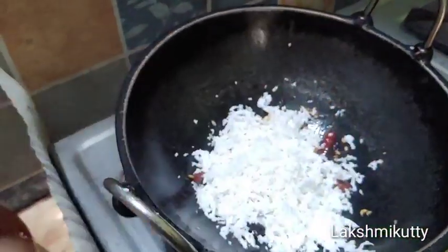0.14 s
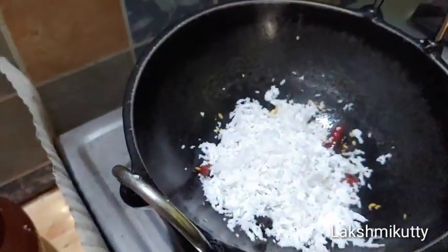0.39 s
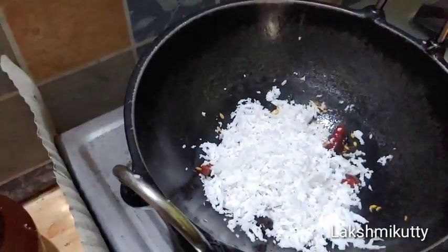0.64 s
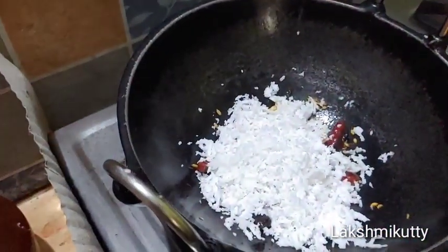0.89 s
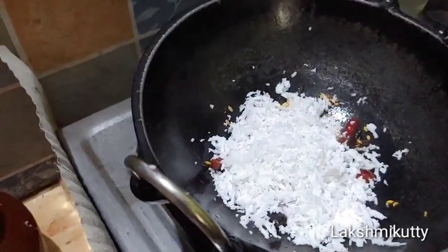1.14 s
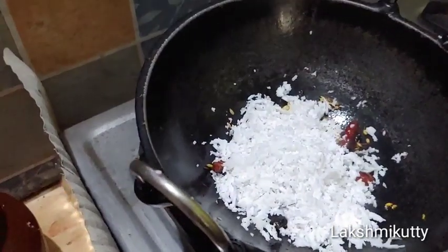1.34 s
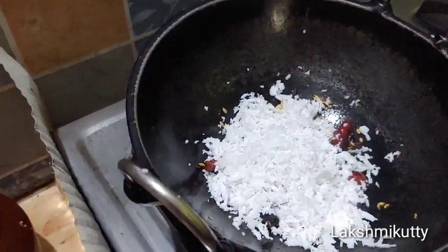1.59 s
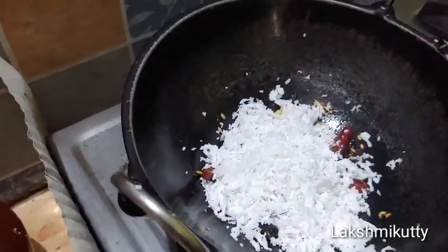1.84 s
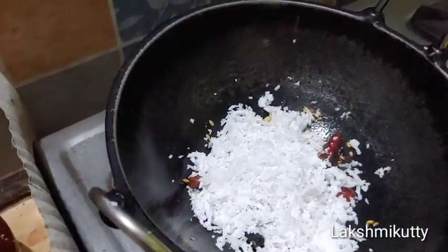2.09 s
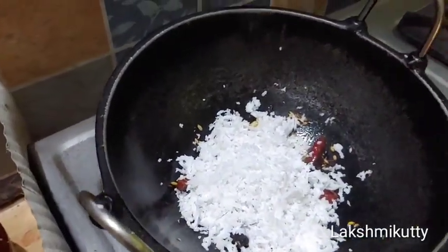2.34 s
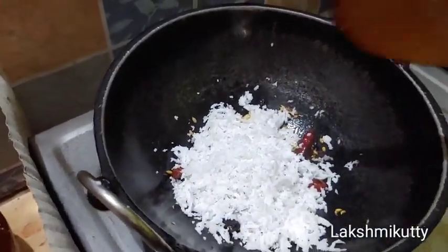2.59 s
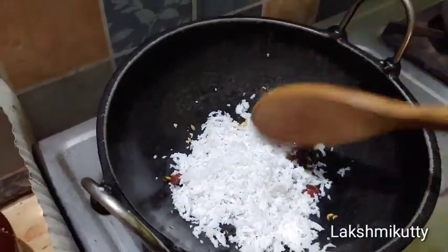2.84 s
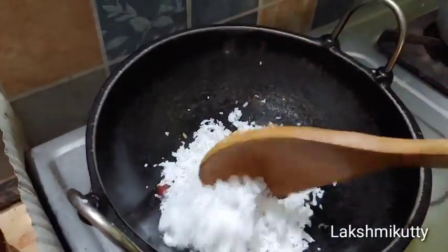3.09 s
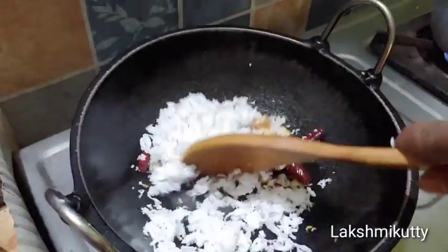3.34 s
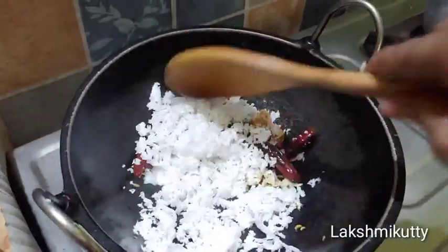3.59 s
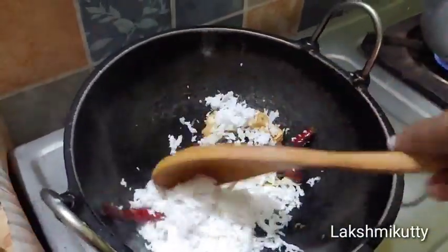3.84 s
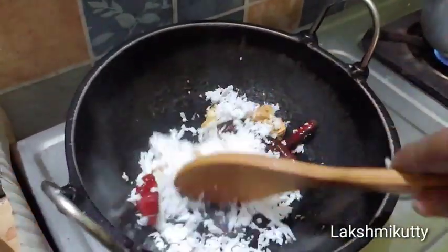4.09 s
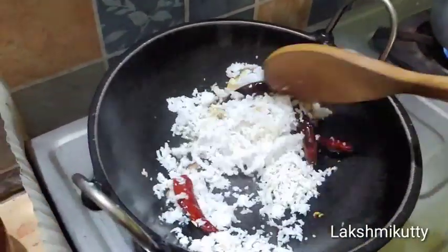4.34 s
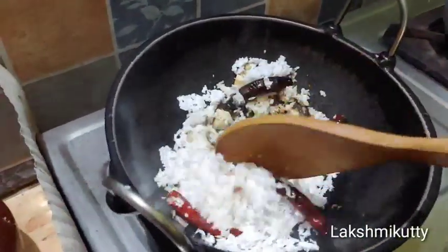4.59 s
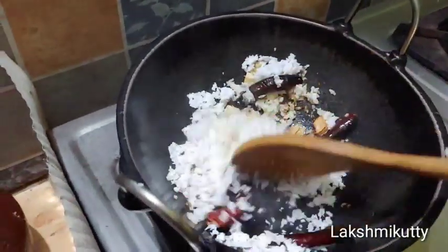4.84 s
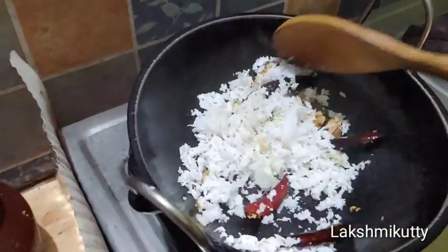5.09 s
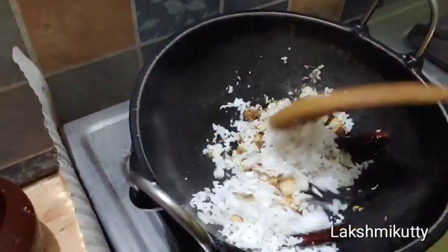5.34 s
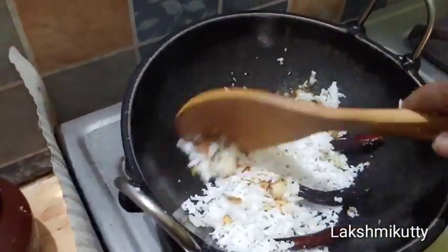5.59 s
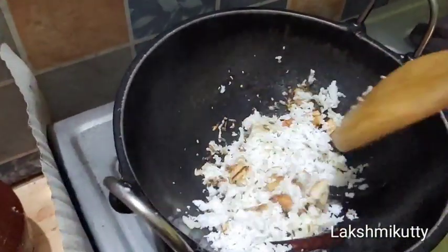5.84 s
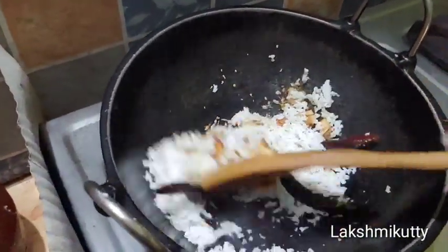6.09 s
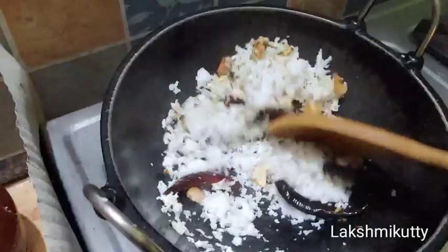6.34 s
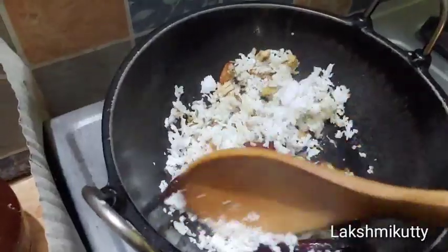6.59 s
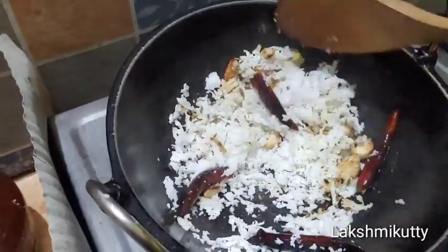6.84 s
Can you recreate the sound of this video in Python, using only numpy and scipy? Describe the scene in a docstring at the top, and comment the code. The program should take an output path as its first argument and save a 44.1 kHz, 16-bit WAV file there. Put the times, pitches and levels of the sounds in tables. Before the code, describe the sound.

Seeds pop sharply over a fine oil sizzle, then a wooden spatula knocks and scrapes the metal pan as frying surges and glass bangles clink.

```python
"""Spices fry in hot oil in a deep metal pan under grated coconut, close below a phone in a small tiled kitchen.
First, seeds pop as resonant noise bursts over a fine sizzle: random clicks and hiss shaped by spectra.
Then a wooden spatula scrapes and knocks the pan, exciting its damped modes, and the sizzle swells in power;
glass bangles clink on the wrist as pairs of damped sines, tones are held, and handling gives dull low bumps.
A short tail of filtered noise from the tiled walls and a low rumble of shaped noise lie beneath it all."""
import sys
import numpy as np
from scipy import signal
from scipy.fft import rfft, irfft
from scipy.io import wavfile
from scipy.ndimage import uniform_filter1d

SR = 44100
rng = np.random.default_rng(int(sys.argv[2]) if len(sys.argv) > 2 else 0)


def ratio_of_db(decibels):
    """Turn decibels (scalar or array-like) into linear amplitude factors; 0 dB maps to 1."""
    return 10 ** (np.asarray(decibels, float) / 20)


def to_wav(s):
    """Save 16-bit WAV."""
    ch = np.atleast_2d(s).T  # columns
    pcm = np.round(np.clip(ch, -1, 1) * 32767)  # PCM
    wavfile.write(sys.argv[1], SR, pcm.astype(np.int16))


N = 306495
TIME = np.arange(N) / SR
SIDES = np.array([[1], [-1]])  # left, right

# simmer of the oil, livelier once the heap is turned: t/s, fine sizzle level/dB, coarse sputter level/dB
SIMMER = [(0.0, -35.5, -51), (0.4, -38, -43), (1.25, -37.5, -40), (1.9, -38.5, -39.5), (2.6, -37.5, -45.5),
          (2.899, -40, -42), (3.15, -37.5, -47), (3.6, -30, -35), (4.0, -32.5, -37), (4.4, -30.5, -40),
          (4.78, -28, -33), (5.11, -29.5, -39), (5.5, -30.5, -35.5), (5.96, -31.5, -37.5),
          (6.12, -23.5, -30), (6.28, -25, -31.5), (6.52, -28, -36), (6.95, -26, -35)]
# swells of the frying sound, most of them while the pan is stirred; a slope of 0 or less acts as 1 ms per 10 dB:
# peak t/s, fine level/dB, coarse level/dB, rise/(s per 10 dB), fall/(s per 10 dB)
SWELLS = [(0.05, -34.5, -25, 0.3, 0.16), (1.335, -38, -30.5, .03, 0.1), (2.984, -22, -20.5, -0.02, 0.02),
          (3.235, -27.5, -47, 0.06, 0.1), (3.331, -17, -17.5, 0.07, 0.17),
          (3.742, -17.5, -19, 0.1134, 0.12), (3.86, -35, -29, 0, -0.2), (3.944, -28, -24.5, .04, -0.6),
          (4.066, -20.5, -44, 0.09, 0.28), (4.159, -21.5, -20.5, 0.09, 0.26),
          (4.475, -18.5, -20.5, 0.05, 0.18), (4.565, -15, -34, -0.16, -0.2), (4.74, -27, -37, -0.18, -0.07),
          (4.834, -22.5, -29, 0.07, 0.06), (4.915, -21.5, -24, 0.12, 0.1), (5.0, -27, -33, 0.2, 0.06),
          (5.205, -22.5, -25, 0.11, 0.1), (5.29, -30, -50, 0, 0.2), (5.349, -19, -34, -0.3, -0.18),
          (5.45, -25.5, -42, 0.27, -1), (5.589, -21, -22.5, 0.07, 0.05), (5.662, -25.5, -44, 0.16, .35),
          (6.349, -20, -22.5, 0.07, .1), (6.465, -26, -44, 0.2, 0), (6.66, -24, -35, 0.12, 0.14),
          (6.73, -23, -28.5, 0.14, 0.1)]
# sudden spatters: t/s, fine level/dB, coarse level/dB, fall/(s per 10 dB)
SPATTERS = [(0.227, -29, -19, 0.1146), (2.924, -25, -19, 0.13), (3.246, -22.5, -17, 0.2),
            (5.982, -26, -23, 0.09)]
# spectrum of the fine sizzle: f/Hz, density level/dB (per Hz)
FINE_SPECTRUM = [(1470, -19.5), (2500, -6.5), (2680, -6.5), (3230, -5), (3950, -7), (4580, -5.5),
                 (5740, -8), (6650, 2), (7470, -4), (9220, -1.5), (11100, -9), (12400, -2), (13700, -7),
                 (14900, -2), (16000, -37)]
# spectrum of the coarse sputter: f/Hz, density level/dB (per Hz)
COARSE_SPECTRUM = [(180, -53), (300, -18), (598, -14), (758, -4.5), (1020, -5), (1420, -3), (1650, -0.5),
                   (1890, -0.5), (2970, -3), (6000, -5.5), (7800, -8.5), (13200, -120)]
# loud pops, energy by band: t/s, crack level/dB, body level/dB, snap level/dB, left minus right level/dB
POPS = [(0.015, 9.5, -2.5, -20, 2), (0.0366, 6, -5, 8.5, -6), (0.043, 11.5, 3, -22, 2),
        (0.0583, 0, -6.5, -20, -18), (0.1128, -4, -5, -4, 0), (0.1813, -2.5, -13, -3, 10),
        (0.2095, -8, -15, -2, 1), (0.224, 7.5, -5, 9.5, 10), (0.2306, 4.5, 2, 6, -14.5),
        (0.263, -4, -14, -18, 3), (0.2727, 1, -5, 3, 6), (0.3119, 1, -4.5, 1, -1),
        (0.3182, -7, -23, 1.5, 17), (0.391, -16, -13, -4, 2), (0.413, 0.5, -3.5, 1.5, 3),
        (0.4665, -4.5, -9, -4, 3), (0.577, -2, -10, -1.5, 0), (0.708, -1, -7.5, -12, 4),
        (0.7696, -16, -32, -1, 13.5), (0.8583, 1.5, 0.5, 0, 4), (0.884, -1.5, -13, -4.5, -1),
        (0.996, -4, -14, 0, -7), (1.0065, 2, -2, 4.5, 9), (1.0108, 3.5, -11, -17, -2),
        (1.218, -5, -7, -2, 12), (1.226, 2, 5.5, -2, 1.5), (1.2586, 0.5, -5, -2, 2),
        (1.3145, 9, 11.5, 13, -4), (1.357, 4.5, -6, 9, 12), (1.4273, -13.5, -16, -1.5, 2),
        (1.4413, -1, -16, 2.5, 4), (1.4463, 0, -3.5, 1, 0), (1.5307, -9.5, -13, -7.5, 14),
        (1.657, -3.5, -15, -8, 12.5), (1.7613, 10, 0, 12.5, -6), (1.771, 13, 1.5, 10.5, -0.5),
        (1.8949, 4, 3.5, -2, 2.5), (2.0178, -5.5, -15, -5, 3), (2.115, -9, -25, -4.5, 3),
        (2.145, 2.5, -0.5, 6.5, 7.5), (2.2372, -7, -8, -7, 0.5), (2.2992, -12, -15, -17, 1),
        (2.3465, 12.5, 6.5, 15, -2), (2.3509, 4.5, -6, -9, 4), (2.4794, -0.5, -13, 3, 10),
        (2.4954, 5, 4.5, 3, -2), (2.5065, 3.5, -27, -4, 5), (2.539, 8, 7, 13.5, 6),
        (2.5541, 7.5, -2.5, -6, -4), (2.7719, -4, -15, -6, 2), (2.9246, -6, 8, -10, 0),
        (2.964, 12, 11.5, 11, -6), (2.9708, -6, -12, 0, 2), (2.9813, 3, -17, 2, 14),
        (2.992, -9, -1, -1, -5), (3.0143, 4, -3, -14, 6), (3.0262, 4, 10, 10.5, -1), (3.048, 1, -20, 4, 7),
        (3.2461, 18.5, 12, 13.5, 7), (3.2538, 13, 11, -1, 2), (3.273, 9, 7, -3, -6), (3.311, 9, 6.5, 4, -5),
        (3.3285, -13, 6, 7, 7), (3.339, 10, 7, -8, -4), (3.343, -7, -6, 3, 3), (3.3758, -1, -1, -2, -1),
        (3.3934, 3.5, -8, -6, 0), (3.628, 2, -9, 6.5, 6), (3.739, 4, -19, 12, 15),
        (3.7927, 0.5, -1.5, -9, -4), (3.943, 4.5, -3, 6, 9), (4.0872, -11, -2.5, 3.5, -1),
        (4.144, 6, 3, 0, -8), (4.2093, 10.5, 2, 15.5, 10), (4.311, -2, -10, -10, 7),
        (4.4475, 7, -21, -13, 18), (4.468, 10, -13, -16, 1.5), (4.4785, 4, -14, 2, 20),
        (4.4959, 6, -20, -10, 13), (4.9314, 3, -11.5, 3, -7), (4.9409, 1, -4, 8, -4),
        (5.0353, -3, -18, 1.5, 1), (5.2001, -2, -20, -7, -6), (5.3376, -5, -7, -7, -1),
        (5.554, -1, -7, -5, -9), (5.5692, -1.5, -3, 8, -21), (5.692, -2, -6.5, 0, 4.5),
        (5.786, -23, -21.5, 4, 5), (5.8796, -6, -27.5, -11, 0.5), (5.983, 8.5, 10, 0, -4),
        (5.9869, 9.5, -8, 9.5, 6), (6.3257, -10, -17, 7, 10), (6.3323, -7, -1.5, 16, 12),
        (6.352, 4.5, -15, -3, -1), (6.3679, 9.5, 4, 13, -0.5), (6.566, -1, -4.5, 1, 11)]
# resonances of a pop, in rows crack, thud, body, snap: f/Hz, width/Hz, left-right unlikeness/1
POP_BANDS = [(2695, 2800, 1), (246, 516, 0.28), (1000, 1080, 0.29), (8840, 9000, 1)]
# resonance of the microphone port that colours the snap: f/Hz, width/Hz, level/dB
PORT = (6550, 700, 9)
# pops that also thump the pan: t/s, thud level/dB
THUMPS = [(0.043, 5.5), (0.2306, 1.5), (0.2728, -5.5), (0.5766, -13), (0.8584, -7.5), (0.9955, -5.5),
          (1.0064, -6), (1.358, -10.5), (1.7613, -9), (1.8945, 0), (2.2366, -7.5), (2.539, 1), (2.964, 5),
          (3.0264, 1), (3.943, -4), (5.0353, -9), (5.9871, -7), (6.566, -8)]
# spatula knocks; a longer, softer contact leaves the high modes out:
# t/s, level/dB, contact/ms, stand mode level/dB, bowl mode level/dB
KNOCKS = [(3.246, -31, 0.27, -25, -39), (3.727, -45, 1.2, -37, -40), (3.85, -22.5, 1.12, -46, -33),
          (3.924, -23, 1.52, -48, -23), (4.013, -28.5, 1.1, -53, -46), (4.123, -27.5, .8, -47, -43),
          (4.144, -36, 0.92, -53, -25), (4.171, -31, 1.5, -46, -40), (4.191, -35, 1.1, -49, -32.5),
          (4.21, -31, 1.4, -55, -38), (4.546, -33.5, 2.1, -55, -28.5), (4.708, -34, 1.7, -52, -35),
          (4.884, -36, 1.1, -54, -41), (4.976, -36, 2.3, -30.5, -32), (5.041, -43.5, 1.3, -41, -41),
          (5.325, -42, 1.2, -40.5, -38), (5.503, -33, 1.4, -55, -43), (5.569, -32.5, 1.6, -55, -38),
          (5.72, -34, 1.74, -44, -39), (5.981, -27.5, 0.22, -49, -36.5), (6.128, -30.5, 1.55, -45.5, -45),
          (6.184, -32, 1.1, -50, -36.5)]
# spatula rubbing the pan: t/s, level/dB
SCRAPE = [(2.9, -55), (3.14, -60), (3.69, -69), (3.81, -46), (4.03, -39.5), (4.07, -40), (4.28, -45),
          (4.53, -42), (5.02, -55), (5.38, -40), (5.55, -51), (5.69, -47), (5.83, -48), (6.01, -42),
          (6.15, -43), (6.23, -46), (6.4, -55), (6.6, -48)]
# modes of the pan on its stand: f/Hz, level/dB, T60/s after a blow
PAN_MODES = [(133, -1.5, 0.53), (225, -2, 0.28), (281.5, -1.5, 0.28), (312.2, -6, 0.29), (369, -2, 0.14),
             (397, -4, 0.21), (451, -7, 0.15), (552, -2, 0.048), (663, -3.5, 0.072), (740, -3, 0.092),
             (795, -8, 0.27), (875, 2, 0.092), (975, -10.5, 0.14), (1085, -0.5, 0.045), (1576, 7, 0.037),
             (1930, 0, 0.033), (2280, 0, .11), (2390, 7, 0.018), (2655, 2, .06)]
# held tones of the pan or a bangle: start t/s, length/s, f/Hz, level/dB
HELD_TONES = [(2.75, 0.17, 300, -53), (4.545, 0.16, 225, -37.5), (4.735, .035, 12230, -33),
              (5.345, 0.1, 133, -39), (5.428, 0.032, 7630, -13.5), (5.498, 0.165, 397, -31)]
# bangle clinks, one row for each ring touched: t/s, level/dB, ring f/Hz
CLINKS = [(3.7259, -20, 12900), (3.7259, -19, 14600), (3.9749, -17, 12900), (4.727, -17, 12900),
          (4.728, -25, 12230), (4.7394, -16.5, 12230), (4.74, -25, 8030), (4.829, -12, 12900),
          (5.0749, -23, 12230), (5.365, -23, 12900), (5.4314, -17, 12900), (5.4314, -26, 7630),
          (5.445, -13, 12900), (5.445, -27, 7630), (5.7414, -15, 12900), (5.7414, -32, 8030),
          (6.4492, -17, 12900), (6.4492, -16, 14600), (6.4574, -8, 12900)]
# glass rings on the wrist: f/Hz, level/dB, T60/s
BANGLES = [(12900, -1, .045), (7630, 4, .08), (8030, 5, .08), (9130, 5, .08), (12230, 6, .08),
           (14600, 7, .06)]
# dull low bumps from handling: t/s, level/dB
BUMPS = [(4.549, -37), (4.742, -31), (5.029, -32), (5.428, -30), (5.82, -29), (5.905, -35)]
# noise tail of the tiled room by band: f/Hz, level/dB, T60/s
ROOM = [(200, -17, 0.13), (680, -9, 0.5), (1730, -5, 0.25), (3150, -5, 0.29), (7600, -2, 0.047),
        (14660, 10, 0.025)]
# spectrum of the kitchen rumble: f/Hz, density level/dB (per Hz)
KITCHEN_SPECTRUM = [(12, -34), (20, -10), (64, 5), (233, -8.5), (279, -3.5), (345, -16), (413, -2),
                    (520, -11.5), (721, -11.5), (1000, -18), (1300, -60), (2200, -120)]

OIL_PAN_DB = 1.5  # left minus right
TICK_COUNT = 140  # small pops at random moments


def unit(x):
    """Normalisation: scale so that the mean of both channels has rms 1."""
    return x / np.sqrt(np.mean(np.mean(x, axis=0) ** 2))


def colour(x, points):
    """Linear filtering: weight the Fourier components by a spectrum of (f/Hz, level/dB)."""
    hz, db = np.transpose(points)
    size = x.shape[-1]
    bins = np.maximum(np.arange(size // 2 + 1) * SR / size, 1)
    gain_db = np.interp(np.log(bins), np.log(hz), db)
    return irfft(rfft(x) * ratio_of_db(gain_db), size)


def ring(x, hz, width_hz):
    """Resonance: a two-pole filter passes a band of the given width."""
    return signal.lfilter(*signal.iirpeak(hz, hz / width_hz, fs=SR), x)


def mode(x, hz, t60):
    """Free damped oscillation: each impulse starts a sine that decays from size 1 by 60 dB in t60."""
    radius = np.exp(-np.log(1000) / (t60 * SR))
    angle = 2 * np.pi * hz / SR
    feedback = [1, -2 * radius * np.cos(angle), radius * radius]
    return signal.lfilter([0, radius * np.sin(angle)], feedback, x)


def train(times, sizes):
    """Impulsive excitation: place impulses of the given sizes at the given times."""
    samples = (np.asarray(times) * SR).astype(int).clip(0, N - 1)
    return np.bincount(samples, sizes, N)


def walk(rate):
    """Slow random modulation: levels held 1 / rate s, then slewed by two moving averages."""
    hold = int(SR / rate)
    steps = np.repeat(rng.standard_normal(N // hold + 1), hold)
    return uniform_filter1d(uniform_filter1d(steps, hold), hold)[:N]


def bubbles(rate, scatter_db, hiss, alike):
    """Shot noise: steam bubbles burst as random clicks over smooth hiss, partly alike left and right."""
    draw = rng.random((2, N))
    spread_db = scatter_db * rng.exponential(size=N).clip(0, 5)
    size = rng.standard_normal((2, N)) * ratio_of_db(spread_db)
    clicks = size * (draw[0] < rate / SR)
    mid, side = unit(clicks) + hiss * rng.standard_normal((2, N))
    return unit(np.sqrt(1 + alike) * mid + np.sqrt(1 - alike) * side * SIDES)


def frying():
    """Addition of powers: high hiss of tiny bubbles and sputter of bigger ones in the pan; swells add to the simmer."""
    spatter_rise_s = .002  # per 10 dB
    coarse_quicker = 0.6  # the sputter rises and falls in this share of the time
    t, fine_db, coarse_db = np.transpose(SIMMER)
    fine_power = ratio_of_db(2 * np.interp(TIME, t, fine_db))
    coarse_power = ratio_of_db(2 * np.interp(TIME, t, coarse_db))
    spatters = [(*row[:-1], spatter_rise_s, row[-1]) for row in SPATTERS]
    for peak, fine_db, coarse_db, rise, fall in SWELLS + spatters:
        before = (peak - TIME) / max(rise, 1e-3)
        after = (TIME - peak) / max(fall, 1e-3)
        down_db = 10 * np.maximum(before, after)
        fine_power = fine_power + ratio_of_db(2 * (fine_db - down_db))
        coarse_power = coarse_power + ratio_of_db(2 * (coarse_db - down_db / coarse_quicker))
    flicker = walk(30)
    fine = unit(colour(bubbles(2000., scatter_db=3.0, hiss=2.63, alike=0.017), FINE_SPECTRUM))
    coarse = unit(colour(bubbles(1200., scatter_db=1.5, hiss=1.32, alike=0.72), COARSE_SPECTRUM))
    sizzle = fine * np.sqrt(fine_power) * ratio_of_db(1.4 * flicker)
    sputter = coarse * np.sqrt(coarse_power) * ratio_of_db(2.5 * flicker)
    pan_db = OIL_PAN_DB + 3.5 * walk(10)  # the balance drifts
    return (sizzle + sputter) * ratio_of_db(SIDES * pan_db / 2)


def pops(burst_s=.00045):
    """Resonance under burst excitation: each seed cracks as brief ragged noise, a little unlike left and right."""
    s, crack_db, body_db, snap_db, pan_db = np.vstack([ticks(), POPS]).T
    # the thud follows the body, with scatter, unless the pop thumps the pan
    thud_db = body_db - 13.5 + 4.5 * rng.standard_normal(len(s))
    for when, db in THUMPS:
        nearest = np.abs(s[TICK_COUNT:] - when).argmin()
        thud_db[TICK_COUNT + nearest] = db
    energy_db = crack_db, thud_db, body_db, snap_db

    steps = np.arange(400)
    decay = np.exp(-steps / (burst_s * SR))
    chance = rng.standard_normal((len(s), 3, len(steps))) * decay  # one common, two for the sides
    shapes = []
    for hz, width, unlike in POP_BANDS:
        burst = chance[:, :1] + unlike * chance[:, 1:]
        shapes.append(ring(ring(burst, hz, width), hz, width))
    port_hz, port_width_hz, port_db = PORT
    shapes[3] = shapes[3] + ratio_of_db(port_db) * ring(shapes[3], port_hz, port_width_hz)

    crack = 0
    for shape, db in zip(shapes, energy_db):
        size = np.sqrt(np.sum(shape.mean(axis=1) ** 2, axis=1))
        crack = crack + shape * (ratio_of_db(db) / size)[:, None, None]
    crack = crack * ratio_of_db(pan_db[:, None, None] * SIDES / 2)
    at = (s[:, None] + steps / SR).ravel()
    return np.array([train(at, crack[:, side].ravel()) for side in range(2)])


def ticks():
    """Random point process: rows of small pops at chance moments, louder while the oil is lively."""
    quiet_db = np.array((-18, -24, -16.5))  # mean crack, body, snap while the simmer is at its quietest
    s = rng.random(TICK_COUNT) * N / SR
    chance = rng.standard_normal((TICK_COUNT, 4))
    at, simmer_db, _ = np.transpose(SIMMER)
    lively_db = 0.62 * (np.interp(s, at, simmer_db) - simmer_db.min())
    level_db = quiet_db + lively_db[:, None] + 4 * chance[:, :3]
    return np.column_stack([s, level_db, OIL_PAN_DB + 5 * chance[:, 3]])


def pan():
    """Modal superposition: blows, each with chatter, and gritty rubbing excite the damped modes of the pan."""
    s, db, contact_ms, stand_db, bowl_db = np.transpose(KNOCKS)
    hz, mode_db, t60 = np.transpose(PAN_MODES)
    cycles = hz[:, None] * contact_ms / 1000  # mode cycles within the contact
    tilt_db = 3.5 * np.log2(hz[:, None] / 330)  # 3.5 dB per octave
    contact_loss_db = 10 * np.log10(1 + cycles ** 7.1)
    drive_db = db + tilt_db - contact_loss_db
    # the pan rocking on its stand and the whole bowl flexing depend on the push
    drive_db[:2] = stand_db, bowl_db
    spot_db = 2.8 * rng.standard_normal((len(s), len(PAN_MODES))).T

    # the spatula chatters: three weaker contacts within 30 ms of each blow
    delay_s = rng.random((len(s), 4)) * .03
    size = 0.35 * rng.standard_normal((len(s), 4))
    delay_s[:, 0], size[:, 0] = 0, 1
    at = (s[:, None] + delay_s).ravel()

    rub_s, rub_db = np.transpose(SCRAPE)
    grit = (rng.random(N) < 300. / SR) * rng.standard_normal(N)
    rub = grit * ratio_of_db(np.interp(TIME, rub_s, rub_db, -99, -99) - 3.5)
    out = 0
    for k, blow_db in enumerate(drive_db + spot_db):
        blows = train(at, (ratio_of_db(blow_db)[:, None] * size).ravel())
        sign = np.cos(np.pi * k)  # neighbouring modes start in opposite directions
        lean_db = 1.1 * sign * SIDES  # and lean to opposite sides
        # rubbing damps the ring
        ringing = mode(blows, hz[k], t60[k]) + mode(rub, hz[k], 0.37 * t60[k])
        out = out + sign * ratio_of_db(mode_db[k] + lean_db) * ringing
    return signal.sosfilt(signal.butter(2, 100, "high", fs=SR, output="sos"), out)


def held_tones(edge_s=0.0045):
    """Amplitude modulation of sines: held tones of the pan or a bangle, which waver, weaken and stop."""
    out = 0
    for start, length, hz, db in HELD_TONES:
        held = np.clip(np.minimum(TIME - start, start + length - TIME) / edge_s, 0, 1)
        fade_db = 4.5 * ((TIME - start) / length).clip(0, 1)
        level_db = db - fade_db + 3.2 * walk(40)
        out = out + held * ratio_of_db(level_db) * np.sin(2 * np.pi * hz * TIME)
    return out


def bangles():
    """Beating of close modes: thin glass rings touch, and each sounds a rough pair of damped tones."""
    nudge_db = -36.5  # the other rings on the wrist are nudged too
    s, db, touched_hz = np.transpose(CLINKS)
    nearest = np.abs(touched_hz[:, None] - np.array(BANGLES)[:, 0]).argmin(axis=1)
    out = 0
    for k, (hz, ring_db, t60) in enumerate(BANGLES):
        touch = train(s, ratio_of_db(np.where(nearest == k, db, nudge_db) + ring_db))
        out = out + mode(touch, hz, t60) + 0.8 * mode(touch, 1.025 * hz, 0.35 * t60)
    # the wrist is nearer the right port than the oil
    return np.array([out, np.roll(out, -1)]) * ratio_of_db(-1.5 * SIDES)


def bumps():
    """Impulse response of a single low mode: dull low bumps from handling."""
    s, db = np.transpose(BUMPS)
    return mode(train(s, ratio_of_db(db)), 100.0, 0.098)


def room(x, gap_s=.004):
    """Reverberation: tiled walls return a noisy tail, longest in the middle range, its bass nearly alike at both sides."""
    t = np.arange(SR // 2) / SR
    tail = 0
    for hz, db, t60 in ROOM:
        mid, side = rng.standard_normal((2, len(t)))
        air = mid + min(hz / 950.0, 1) * side * SIDES
        tail = tail + ratio_of_db(db - 60 * t / t60) * unit(ring(air, hz, 1.38 * hz))
    tail = tail * np.minimum(t / gap_s, 1)  # the tail grows in over the gap
    return signal.fftconvolve(x, tail, axes=1)[:, :N]


def kitchen():
    """Filtered random noise: the low rumble of the gas flame and the house, slowly wavering."""
    mid, side = rng.standard_normal((2, N))
    rumble = unit(colour(mid + 0.13 * side * SIDES, KITCHEN_SPECTRUM))
    return rumble * ratio_of_db(-49.5 + 4.4 * walk(7.4))


def scene():
    """Superposition: sharp sounds wake the room; the oil is nearer the left microphone, low sounds lean right."""
    low = (pan() + held_tones()) * ratio_of_db(-.6 * SIDES)
    sharp = pops() + low + bangles()
    left, right = sharp + frying()
    near = np.array([left, np.roll(right, 2)])  # the left leads by 2 samples
    return near + ratio_of_db(-42) * room(sharp) + (bumps() + kitchen()) * ratio_of_db(-.8 * SIDES)


def roll_off(x):
    """The treble ends steeply here."""
    return signal.sosfilt(signal.butter(12, 16470, fs=SR, output="sos"), x)


def record(dry):
    """Band limiting and clipping: the microphone dips near 11 kHz; the phone clips loud peaks and cuts the top."""
    dipped = dry - .5 * ring(dry, 11250.0, 770.0)
    ceiling = .88  # of full scale, ahead of the top cut
    clipped = dipped.clip(-ceiling, ceiling)
    top = signal.ellip(10, .2, 30, 15550, fs=SR, output="sos")
    mix = signal.sosfilt(top, clipped)
    return roll_off(mix)


dry = scene()
out = record(dry)
to_wav(out)
```